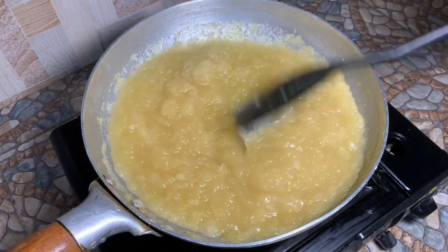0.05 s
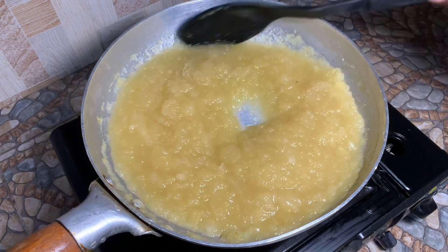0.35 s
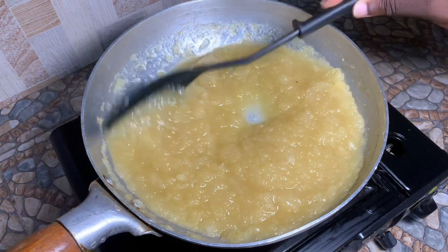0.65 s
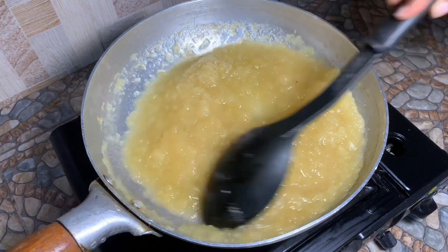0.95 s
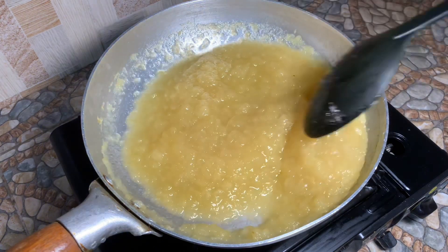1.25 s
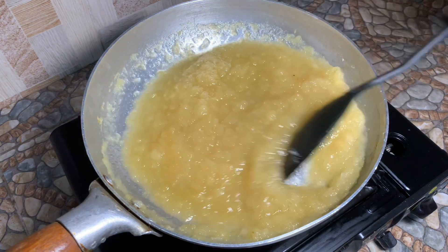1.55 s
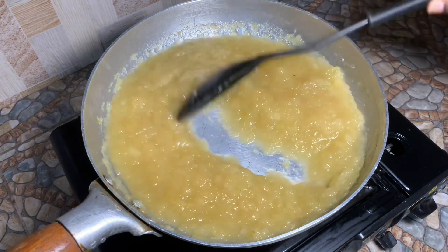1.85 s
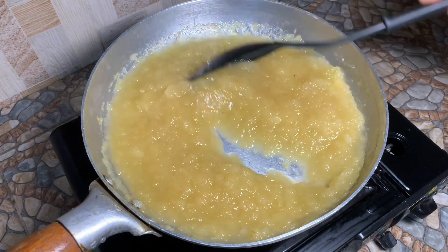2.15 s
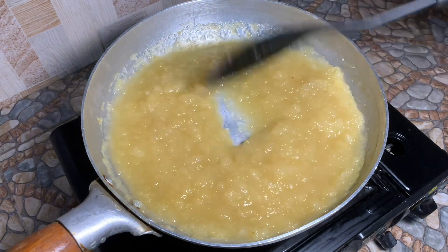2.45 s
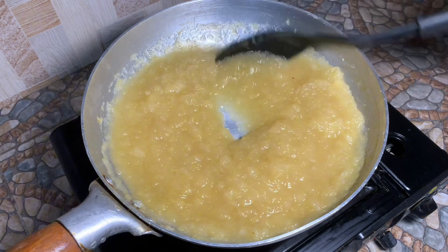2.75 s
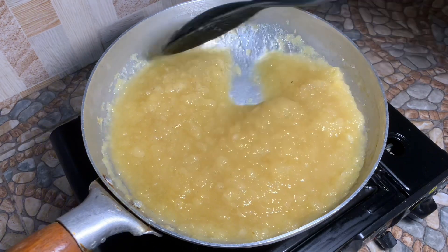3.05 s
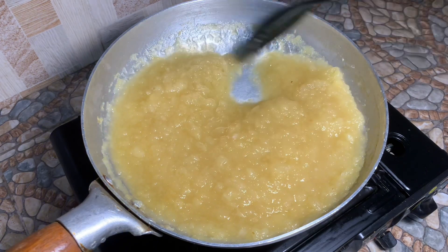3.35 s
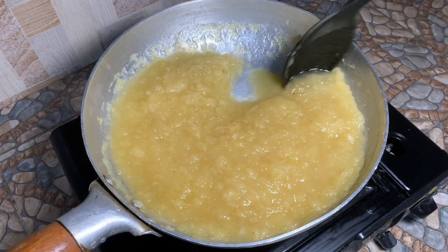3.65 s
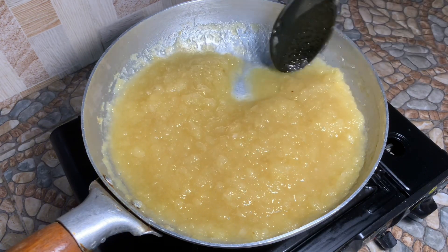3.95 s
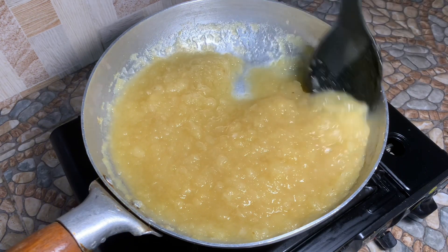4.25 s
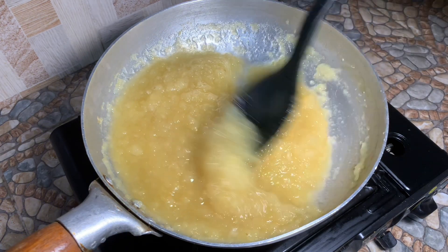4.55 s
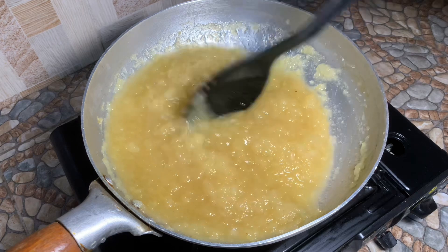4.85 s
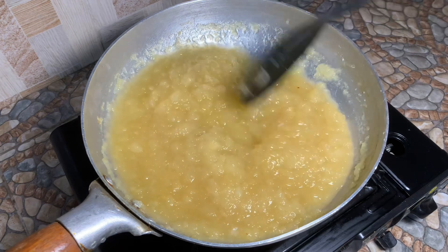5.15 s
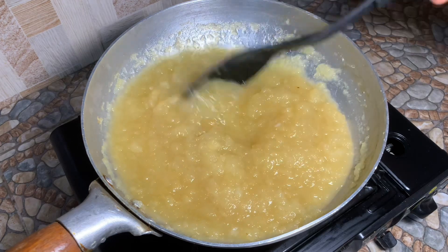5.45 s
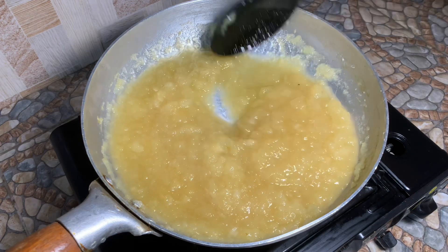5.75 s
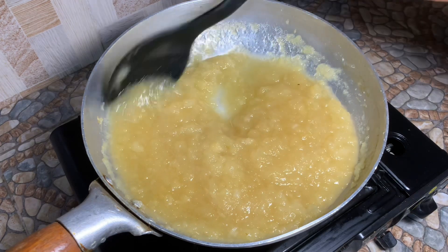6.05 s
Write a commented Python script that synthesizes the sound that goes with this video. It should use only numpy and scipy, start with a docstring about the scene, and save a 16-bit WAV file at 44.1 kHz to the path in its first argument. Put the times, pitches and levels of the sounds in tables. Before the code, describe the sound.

Close up in stereo, a plastic spoon knocks and slides around a metal pan of thick puree, each push bringing soft wet squelches and little smacks. Scattered taps lead to a busier run of clacks and a brief low wobble of the pan, then more strokes and a sharp knock near the end. The small kitchen adds a short echo, a steady low hum and a faint, far trill like crickets.

```python
"""A plastic spoon stirs thick fruit puree in a metal pan, on the gas stove of a small tiled kitchen.
Up front on a stereo pair, its knocks and scrapes send bending waves across the pan and ring the damped
modes; the puree squelches and pops, and heavy pushes rock the pan on its support.
Behind lie a low rumble, mains hum and faint appliance tones, and farther off a high pulsing trill,
probably two crickets."""
import sys
import numpy as np
from scipy import signal
from scipy.fft import rfft, irfft, next_fast_len
from scipy.io import wavfile
from scipy.ndimage import uniform_filter1d

SR = 44100
rng = np.random.default_rng(int(sys.argv[2]) if len(sys.argv) > 2 else 0)


def put_to_file(sound):
    """Save the sound as 16-bit audio at rate SR, in the file named by the first command-line argument."""
    columns = np.atleast_2d(sound).T  # one column per channel
    safe = np.clip(columns, -1, 1)
    whole_steps = np.round(safe * 32767)
    wavfile.write(sys.argv[1], SR, whole_steps.astype(np.int16))


N = 278271
TIME = np.arange(N) / SR
SIDES = np.array([[1], [-1]])  # left and right microphone


def undb(db):
    """Decibels to gain."""
    return 10 ** (np.asarray(db) / 20)


def unit(x):
    """Scale to rms 1."""
    return x / np.sqrt(np.mean(x ** 2))


def freqs(n):
    """Frequencies of the spectrum of n samples, 1 Hz at the least."""
    return np.maximum(np.arange(n // 2 + 1) * SR / n, 1)


def colour_db(points, hz):
    """A spectrum table read on a log-frequency axis."""
    f, db = np.transpose(points)
    return np.interp(np.log(hz), np.log(f), db)


def shelf(hz, corner_hz):
    """Smooth step from 0 below the corner to 1 above it."""
    return 1 / (1 + (corner_hz / hz) ** 4)


def pulse(db):
    """The shortest causal pulse with this spectrum."""
    cepstrum = irfft(np.log(undb(db)))
    half = len(cepstrum) // 2
    cepstrum[1:half] *= 2
    cepstrum[half + 1:] = 0
    return irfft(np.exp(rfft(cepstrum)))


def through(x, response):
    """Convolve, keeping the length of x; one row per channel."""
    return signal.oaconvolve(np.atleast_2d(x), np.atleast_2d(response), axes=1)[:, :x.shape[-1]]


def resonate(x, hz, width_hz):
    """A resonance whose centre may move; gain 1 at the centre."""
    turn = np.exp(2j * np.pi * np.cumsum(hz) / SR)
    pole = np.exp(-np.pi * width_hz / SR)
    return 2 * np.real(turn * signal.lfilter([1 - pole], [1, -pole], x / turn))


def add(track, start_s, sound):
    """Mix a sound into a track."""
    i = max(int(start_s * SR), 0)
    track[i:i + len(sound)] += sound[:max(N - i, 0)]


def noise(gain, width):
    """Stereo noise of rms 1 with a spectrum gain(Hz) and a side share width(Hz)."""
    n = next_fast_len(N, True)
    hz = freqs(n)
    mid, side = rng.standard_normal((2, 2 * len(hz))).view(complex) * gain(hz)
    side = side * width(hz)
    return unit(irfft(np.array([mid + side, mid - side]), n)[:, :N])


def band(centre_hz, width_hz, side):
    """Stereo noise in one bell-shaped band."""
    return noise(lambda hz: np.exp(-2 * ((hz - centre_hz) / width_hz) ** 2), lambda hz: side)


def walk(rate_hz):
    """Smooth random wandering with spread 1."""
    hold = int(SR / rate_hz)
    steps = np.repeat(rng.standard_normal(N // hold + 1), hold)
    return unit(uniform_filter1d(steps, hold)[:N])


def grains(per_s, spread_db):
    """Random impulses of uneven size."""
    size = undb(spread_db * np.clip(rng.standard_normal(N), -2, 2))
    return unit((rng.random(N) < per_s / SR) * size * rng.choice([-1, 1], N))


# Steady appliance tones around the kitchen: f/Hz, relative level/dB, width/Hz
APPLIANCE_TONES = [(397.4, -72, 9), (750, -75.5, 27), (1510, -90.5, 44), (2032, -79.5, 47), (2900, -86, 71),
                   (3154, -84.5, 110), (5100, -83, 300)]

def appliances(level_db=-70.5):
    """Faint whines, each a narrow band of noise."""
    def bells(hz):
        return sum(undb(db) / np.sqrt(width) * np.exp(-2 * np.minimum(((hz - f) / width) ** 2, 20))
                   for f, db, width in APPLIANCE_TONES)
    return undb(level_db) * noise(bells, lambda hz: 0.7)


# The kitchen's noise floor at the microphones: f/Hz, relative level/dB
RUMBLE_SPECTRUM = [(20, -31), (36, -15), (62, 3.5), (90, 0.5), (140, -5), (185, -12.5), (260, -15.5),
                   (420, -18), (700, -27.5), (1100, -35.5), (2400, -40.5), (4300, -43), (9000, -49.5),
                   (14000, -52.5)]

def room_tone(rumble_db=-55.0, waver_db=2.0, hum_hz=50.2, hum_db=-55.5, hum_lag_rad=0.27):
    """A low wavering rumble, much alike at both microphones, with mains hum."""
    rumble = noise(lambda hz: undb(colour_db(RUMBLE_SPECTRUM, hz)),
                   lambda hz: np.clip(hz / 1300, 0.15, 0.8))
    hum = np.sqrt(2) * np.sin(2 * np.pi * hum_hz * TIME + hum_lag_rad * SIDES)
    return rumble * undb(rumble_db + waver_db * walk(4.915)) + undb(hum_db) * hum


def cricket(pace, voice, depth_db=4.5, flutter_db=1.47):
    """Shrill regular chirps, smeared by distance."""
    chirps_so_far = np.interp(TIME, *np.transpose(pace))
    chirp_db = depth_db * (np.cos(2 * np.pi * chirps_so_far) - 0.98)
    return sum(band(hz, width, side=0.81) * undb(db + chirp_db + flutter_db * walk(70))
               for hz, width, db in voice)


# Pace of the lower and the higher distant cricket: t/s, chirps so far
LOW_CHIRPS = [(-.05, 0), (1.29, 9), (2.45, 17), (3.70, 25), (4.75, 32), (5.36, 36), (6.37, 43)]
HIGH_CHIRPS = [(-.13, 0), (1.09, 8), (2.30, 16), (3.53, 24), (4.90, 33), (6.44, 43)]
# Their resonances as heard from the kitchen: f/Hz, width/Hz, level/dB
LOW_RESONANCES = [(5844, 345, -67.5), (6160, 440, -66.5)]
HIGH_RESONANCES = [(6390, 430, -72), (6760, 250, -69.5)]

def crickets(hiss_db=-81.5):
    """Two far insects drift in and out of step; a thin steady hiss lies above them, to the right."""
    hiss = band(8600, 1060, side=1.0) * undb(hiss_db) * np.array([[0.3], [1.3]])
    return cricket(LOW_CHIRPS, LOW_RESONANCES) + cricket(HIGH_CHIRPS, HIGH_RESONANCES) + hiss


def tiled_walls(direct, wet_db=-3.5, t60_s=0.43, treble_t60_s=0.54, build_s=0.0018, size=22050):
    """The direct sound plus a short dense tail off the tiles, wide except in the bass."""
    t, hz = np.arange(size) / SR, freqs(size)
    mid, side = rfft(rng.standard_normal((2, size)))
    width = np.minimum(hz / 814, 1)
    reflections = (mid + SIDES * side * width) / np.sqrt(1 + width ** 2)
    treble = shelf(hz, 4600)
    low_tail = irfft(reflections * (1 - treble)) * undb(-60 * t / t60_s)
    high_tail = irfft(reflections * treble) * undb(-60 * t / treble_t60_s)
    build_up = 1 - np.exp(-(t / build_s) ** 2)
    tail = unit((low_tail + high_tail) * build_up) / np.sqrt(size)
    return direct + undb(wet_db) * through(direct, tail)


# At the stove, peaks of the pan's shudder under heavy pushes: t/s, level/dB
SHUDDER_PEAKS = [(.8, -57), (3.93, -45), (4.2, -48), (5.87, -59), (6.22, -63)]

def shudder(centre_hz=127.0, width_hz=58.0, rise_db_per_s=91, fall_db_per_s=218):
    """The pan rocks on its support: a low drone builds up to each peak and dies away."""
    levels_db = [db - np.maximum(rise_db_per_s * (s - TIME), fall_db_per_s * (TIME - s))
                 for s, db in SHUDDER_PEAKS]
    return band(centre_hz, width_hz, side=0.16) * undb(np.max(levels_db, axis=0))


def fizz(shear_db, gain_db=-0.5, right_db=2.5):
    """Fine wet fizz scattered off the pan wall, mostly to the right microphone."""
    return band(8570, 2600, side=1.0) * undb(shear_db + gain_db - right_db * SIDES)


# Inside the pan, spectrum of a bursting wet film: f/Hz, relative level/dB
FILM_SPECTRUM = [(400, 13), (1500, 3.5), (3500, 2.5), (6000, -1), (8800, -3.5), (11000, -25), (13300, -8.5)]

def squelch(shear_db, gain_db=-3.0, pocket_db=12.5, pocket_hz=3570.0, pocket_width_hz=920.0, size=1024):
    """Tiny films burst in the sheared puree and ring air pockets that keep changing size."""
    crackle = grains(per_s=1100, spread_db=5) * undb(2 * walk(50))
    burst = pulse(colour_db(FILM_SPECTRUM, freqs(size)))
    wet = through(crackle * undb(shear_db + gain_db), burst)[0]
    wandering_hz = pocket_hz * 2 ** (0.36 * walk(60))
    return wet + undb(pocket_db) * resonate(wet, wandering_hz, pocket_width_hz)


# The puree lets go of spoon and pan: t/s, relative level/dB, body under the top treble/dB
PUREE_POPS = [(1.6711, -68.5, 26.5), (2.171, -43.5, -31), (2.426, -59, -14), (2.776, -60, 7),
              (3.151, -50.5, 4.5), (3.373, -55.5, 18), (3.451, -53, 1), (3.79, -66, 22), (3.917, -58, 1),
              (3.9661, -66.5, 21), (4.0138, -64, 18), (4.0903, -59, 13), (4.117, -57, 4), (4.6366, -55, 8),
              (5.5906, -58, 7), (5.7615, -44, 1), (5.7704, -50.5, 9), (5.9259, -55, -2),
              (5.9847, -55.5, 7.5)]
# Spectrum of one pop: f/Hz, relative level/dB
POP_SPECTRUM = [(500, 10.5), (1500, 5), (4000, 2), (7000, -5), (9000, 4), (14000, -12.5)]

def pops(gain_db=-2.5, body_db=1.0, fade_s=0.0057, size=1024):
    """Larger pockets tear open with a short smack."""
    out, hz = np.zeros(N), freqs(size)
    for s, db, body in PUREE_POPS:
        tear = rng.standard_normal(size) * np.exp(-np.arange(size) / SR / fade_s)
        tone_db = colour_db(POP_SPECTRUM, hz) + (body + body_db) * (1 - shelf(hz, 7300))
        add(out, s, through(tear, pulse(tone_db + db + gain_db))[0])
    return out


# Modes of the filled pan on the stove: f/Hz, relative level/dB, t60/s
PAN_MODES = [(313.4, -0.5, 0.15), (341, -3, 0.22), (407, -7, 0.12), (460, -11.5, 0.09), (526.5, 0.5, 0.074),
             (570, -1, 0.18), (721, -12.5, 0.089), (800, 0.5, 0.032), (990, -32, 0.27), (1107, -1.5, 0.058),
             (1312, 1.5, 0.061), (1424, -2, 0.033), (1556, -2, 0.064), (1850, -9, 0.12), (1935, 3.5, 0.028),
             (2150, -2, .08), (2425, -5, 0.078), (2790, 1, 0.036), (2910, -10, 0.08), (3110, 3.5, 0.065),
             (3420, -4, 0.1), (3650, 3.5, 0.035), (4130, -4, 0.11), (4460, -3, 0.12), (5200, 2, 0.13),
             (5870, 10.5, 0.094)]

def pan_responses(count, crossing_s=0.0036, ring_db=1.5, spread_rad=0.9, mic_lag_s=0.0001, size=8192):
    """One stereo response per contact spot: a bending wave arrives treble first, then the modes ring."""
    hz, t = freqs(size), np.arange(size) / SR
    # bending speed grows as the root of frequency; crossing_s holds at 1 kHz
    wave = np.exp(-4j * np.pi * crossing_s * np.sqrt(1000 * hz))
    # the long waves reach one microphone first; the short ones scatter to both alike
    wave = wave * np.exp(1j * np.pi * hz * mic_lag_s * (1 - shelf(hz, 5060)) * SIDES)
    mode_hz, db, t60_s = np.transpose(PAN_MODES)
    decay = np.log(1000) / t60_s
    modes = np.exp(np.outer(2j * np.pi * mode_hz - decay, t)) * np.sqrt(decay)[:, None] * 38 / SR
    # every spot drives the modes in its own phases, and each mode radiates its own pattern
    _, lean, phase = rng.standard_normal((count, 3, 1, len(PAN_MODES))).swapaxes(0, 1)
    drive = undb(db + ring_db) * np.exp(1j * (phase + spread_rad * lean * SIDES))
    ring = (drive @ modes).real
    return irfft(wave * (1 + rfft(ring)))


def swell(start_s, length_s, swell_db, fall_db_per_s, rise_db_per_s=609):
    """Envelope in dB: an attack, a steady change of swell_db that ends at 0 dB, a release."""
    t = TIME - start_s
    attack = rise_db_per_s * np.minimum(t, 0)
    ramp = swell_db * (np.clip(t / length_s, 0, 1) - 1)
    return attack + ramp - fall_db_per_s * np.maximum(t - length_s, 0)


# Pushes of the spoon through the puree, and at 1.38 s the low ring after a knock; levels relative:
# t/s, length/s, swell/dB, final scrape/dB, bass/dB, final squelch/dB, spoon hollow f/Hz, hollow/dB
STIR_SWELLS = [(0, 0.017, -5, -63, 6, -85, 1180, -2), (0.408, 0.45, 9.5, -61.5, 13, -75.5, 1190, -4),
               (0.937, 0.049, 0.5, -60, 3, -82, 980, 6), (1.38, 0.037, -2, -55.5, 8.5, -76, 1400, 3),
               (1.514, .14, 7.5, -59.5, -11, -73, 1540, 13.5),
               (1.68, .11, -3.5, -60.5, 3.5, -79.5, 1630, 5.5),
               (2.646, 0.069, -4.5, -63.5, 9.5, -78, 1900, 2), (2.74, 0.037, 6, -48, -12, -70, 1770, 7.5),
               (3.16, 0.23, -0.5, -61.5, -3, -80, 1400, -4), (3.353, 0.04, 6, -50, 7, -61, 1470, -15),
               (3.421, 0.03, 2.5, -49, 9, -67.5, 1450, -20), (3.734, 0.071, 7, -46, 3.5, -74, 1510, -21),
               (3.89, 0.15, -3, -62, 6, -81, 1450, -18), (4.07, 0.049, 4, -55, 3, -68, 1400, -20),
               (4.17, .025, -2.5, -55.5, 1.5, -74.5, 1400, -22), (4.276, 0.14, 11, -56, -1, -80, 1710, -1),
               (4.9, .05, 4.5, -68.5, 11, -80.5, 1790, -2), (5.3, 0.13, 10.5, -60.5, 11.5, -88, 2010, 10.5),
               (5.403, 0.084, 3.5, -49.5, -3.5, -72, 1620, 0), (5.768, 0.03, 2.5, -49, 7, -76, 1680, -19),
               (5.984, 0.092, 3.5, -59.5, 1, -64, 1850, 9), (6.128, 0.11, 9.5, -51, -8, -68.5, 1400, -11),
               (6.294, .03, -1, -53, 19.5, -74, 1300, -13)]

def shearing(drain_db_per_s=182):
    """Level in dB of the wet sounds: the puree is sheared, then drains off the spoon."""
    return np.max([wet_db + swell(s, length, grow, drain_db_per_s)
                   for s, length, grow, _, _, wet_db, *_ in STIR_SWELLS], axis=0)


def sliding(slip_off_db_per_s=212):
    """The strongest swell of the moment sets level, bass and hollow of the scrape."""
    levels_db = np.array([db + swell(s, length, grow, slip_off_db_per_s)
                          for s, length, grow, db, *_ in STIR_SWELLS])
    *_, bass_db, _, hollow_hz, hollow_db = np.transpose(STIR_SWELLS)[:, levels_db.argmax(axis=0)]
    return levels_db.max(axis=0), bass_db, hollow_hz, hollow_db


# Force of the spoon sliding on the pan: f/Hz, relative level/dB
SLIP_SPECTRUM = [(100, -25), (200, -1.5), (320, 11), (600, 5), (900, 4.5), (1500, 4), (2100, 1), (2800, -6),
                 (4500, -12), (7000, -32), (14000, -49)]

def scrape(gain_db=1.5, bass_db=-1.5, patchy_db=2.5, hollow_width_hz=210.0, circling_hz=2.3, size=1024):
    """The spoon edge sticks and slips over the metal in uneven little runs, moving from spot to spot."""
    db, bass, hollow_hz, hollow_db = sliding()
    hz = freqs(size)
    slips = grains(per_s=1400, spread_db=3.5) * undb(db + gain_db + patchy_db * walk(110))
    slip = pulse(colour_db(SLIP_SPECTRUM, hz))
    lowpass = pulse(-20 * np.log10(1 + (hz / 650) ** 2))
    slip_bass = irfft(rfft(slip) * rfft(lowpass))
    force = (through(slips, slip) + through(slips * (undb(bass + bass_db) - 1), slip_bass))[0]
    force += undb(hollow_db) * resonate(force, hollow_hz * (1 + 0.15 * walk(25)), hollow_width_hz)
    out, spots = np.zeros((2, N)), pan_responses(count=3)
    for k, spot in enumerate(spots):
        share = (1 + np.cos(2 * np.pi * (circling_hz * TIME + k / len(spots)))) / len(spots)
        out += through(force * share, spot)
    return out


# Up front, spoon meets pan, levels relative: t/s, level/dB, bass/dB, treble/dB,
# clack of the spoon bowl f/Hz, clack/dB, skid decay/s
SPOON_KNOCKS = [(0.814, -34.5, 1.5, -16, 1320, 3, 0.012), (0.944, -29.5, -9.5, -23, 1080, 1.5, 0.011),
                (1.369, -35, -13, -7.5, 2300, 22.5, 0.0019), (1.372, -32.5, -10.5, -4.5, 750, 6.5, 0.0042),
                (1.674, -28, -4.5, -18.5, 1370, 1, 0.0071), (1.801, -43, -15, -25, 980, 12, 0.0048),
                (2.020, -52, -23, -7.5, 1760, 15.5, 0.0023), (2.6037, -36, -8, -14, 1480, 4, 0.0021),
                (2.758, -36, -15, -22, 1800, 6, .016), (3.151, -21.5, 4, -19.5, 1400, 3.5, 0.000095),
                (3.357, -31.5, 0.5, -19.5, 1110, -0.5, 0.0053), (3.415, -31.5, -9, -14, 1770, 14, 0.0035),
                (3.661, -38, 9.5, -19, 1760, 6, 0.00051), (3.683, -38, -5, -17, 1320, 7, 0.0098),
                (3.729, -40, 0, -8.5, 1200, 5, 0.014), (3.755, -28.5, -16, -17.5, 1300, 6, 0.0063),
                (3.7947, -30.5, -13, -13, 1030, 7.5, 0.0057), (3.965, -54, 5, -18, 1980, 8, 0.0036),
                (4.037, -36.5, -2.5, -18, 1400, 0.5, 0.015), (4.194, -37, -11, -30, 1100, 1, 0.0064),
                (4.379, -37.5, 5, -9.5, 830, 11, 0.0049), (5.448, -38, -7.5, -11, 570, 16.5, 0.0058),
                (5.763, -36.5, 4, -4.5, 760, 8, 0.011), (5.793, -35, 0, -23, 790, 16, 0.0085),
                (5.927, -41, 1, -10.5, 1220, -5, 0.0033), (6.2184, -23.5, -4, -9, 1180, 10, 0.00088),
                (6.288, -32, 7, -18, 1300, -11, 0.0053)]
# Force of one knock: f/Hz, relative level/dB
KNOCK_SPECTRUM = [(60, -11), (150, -2), (280, 5.5), (550, 2), (1200, -2), (2000, -1.5), (3000, -5.5),
                  (5000, -11), (9000, -23), (15000, -48)]

def knocks(gain_db=26.0, treble_db=2.5, clack_octaves=0.14, chatter=0.16, lead_s=0.001704, size=2048):
    """A push, then a brief skid of the tip; soft flat contacts are bassy, the bare edge clacks."""
    out, hz, t = np.zeros((2, N)), freqs(size), np.arange(size) / SR
    spots = pan_responses(count=len(SPOON_KNOCKS))
    for (s, db, bass, treble, clack_hz, clack_db, skid_s), spot in zip(SPOON_KNOCKS, spots):
        tone_db = colour_db(KNOCK_SPECTRUM, hz)
        tone_db += bass * (1 - shelf(hz, 395)) + (treble + treble_db) * shelf(hz, 1570)
        tone_db += clack_db / (1 + (np.log2(hz / clack_hz) / clack_octaves) ** 2)
        contact = (t == 0) + chatter * rng.standard_normal(size) * np.exp(-t / skid_s)
        force = through(contact / np.linalg.norm(contact), pulse(tone_db + db + gain_db))
        for channel, sound in zip(out, through(spot, force)):
            add(channel, s - lead_s, sound)
    return out


def scene():
    """At the microphones: spoon and puree sound through pan and kitchen, over the background."""
    shear_db = shearing()
    stirring = tiled_walls(knocks() + scrape() + squelch(shear_db) + pops())
    return stirring + fizz(shear_db) + shudder() + crickets() + room_tone() + appliances()


def record(dry, top_hz=14450):
    """The recorder cuts the top with a steep low-pass."""
    return signal.sosfilt(signal.ellip(8, 0.2, 70, top_hz, fs=SR, output="sos"), dry)


dry = scene()
out = record(dry)
put_to_file(out)
```